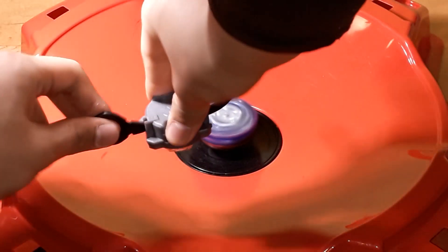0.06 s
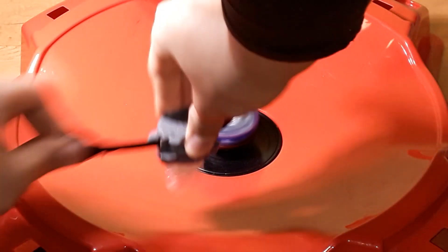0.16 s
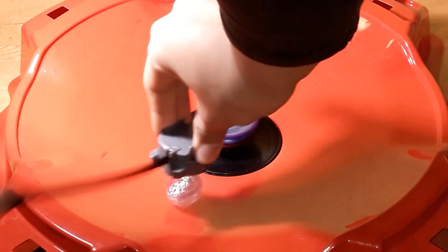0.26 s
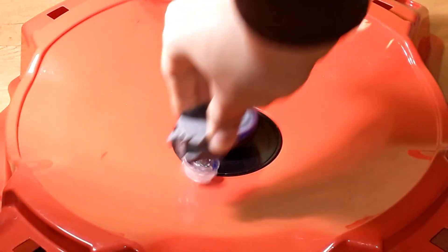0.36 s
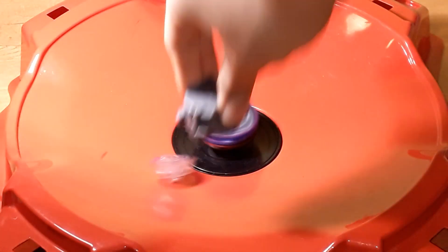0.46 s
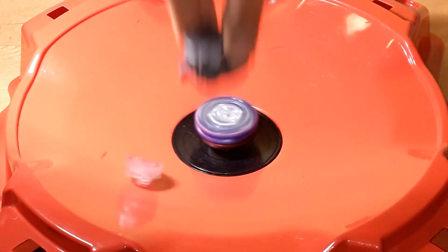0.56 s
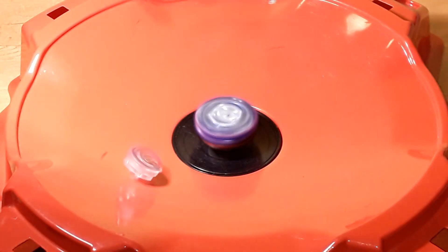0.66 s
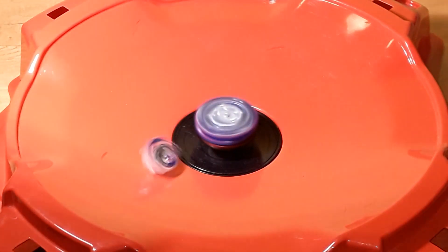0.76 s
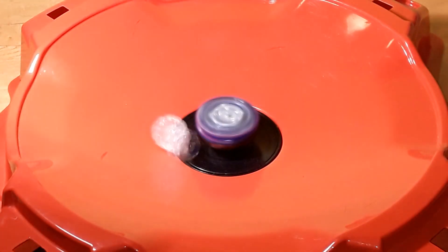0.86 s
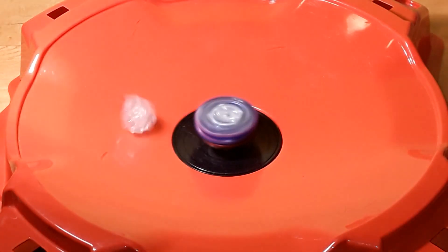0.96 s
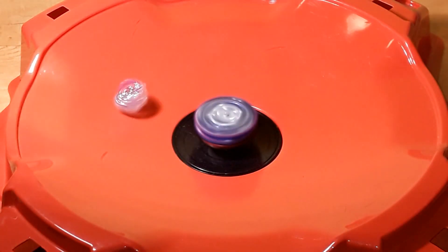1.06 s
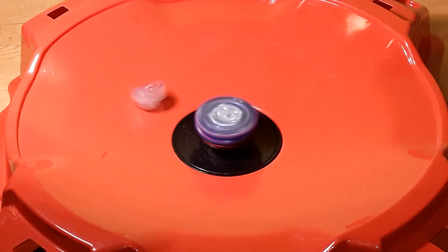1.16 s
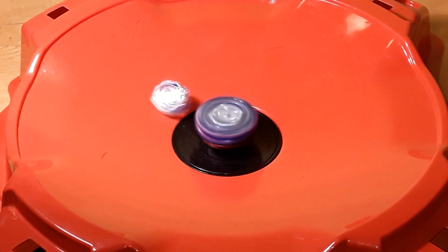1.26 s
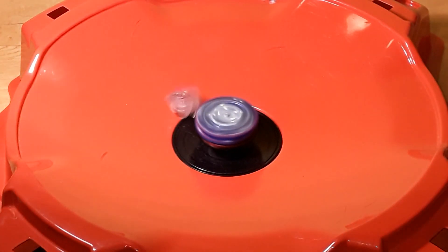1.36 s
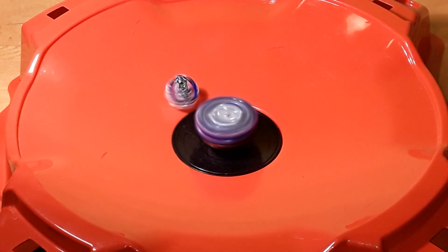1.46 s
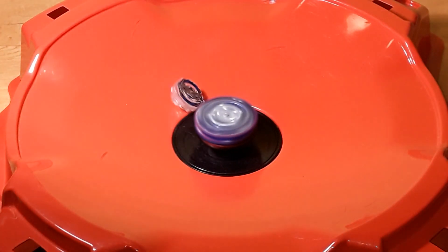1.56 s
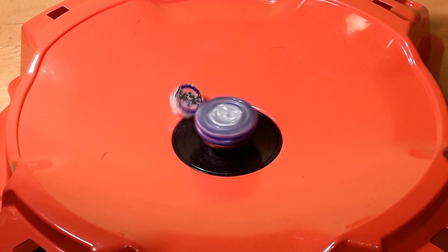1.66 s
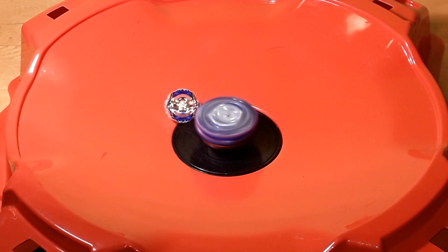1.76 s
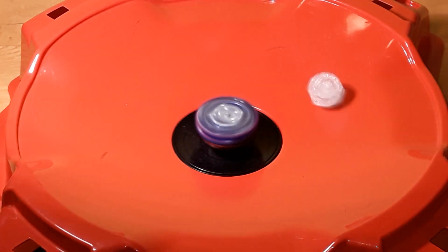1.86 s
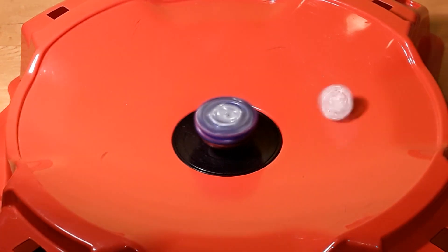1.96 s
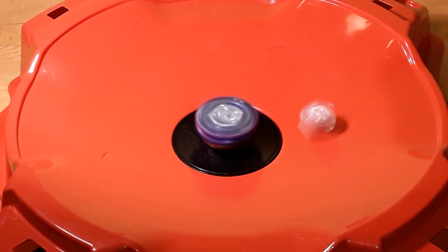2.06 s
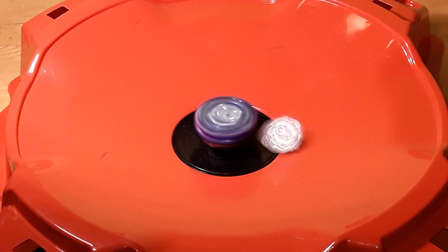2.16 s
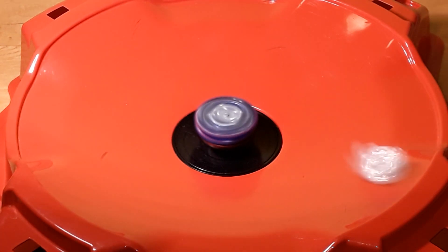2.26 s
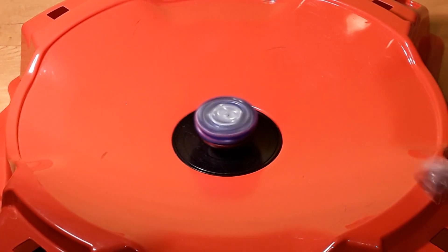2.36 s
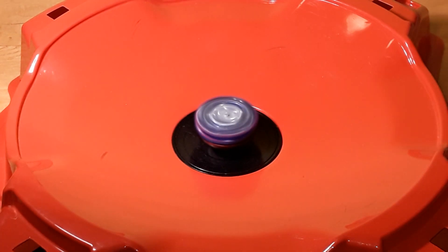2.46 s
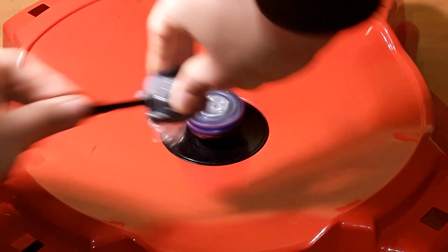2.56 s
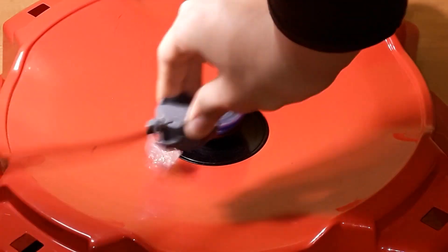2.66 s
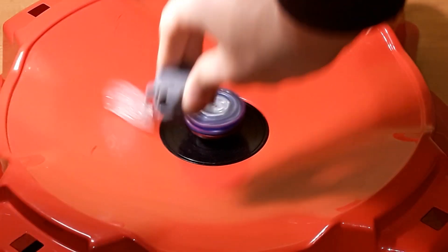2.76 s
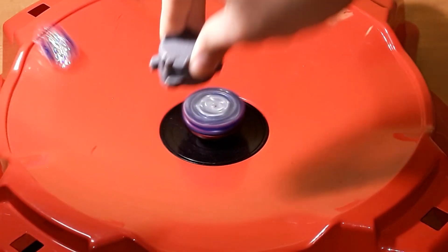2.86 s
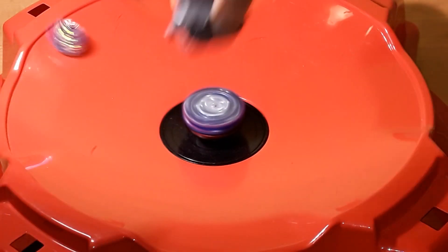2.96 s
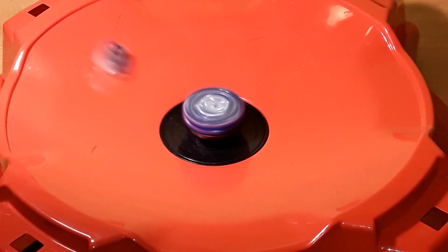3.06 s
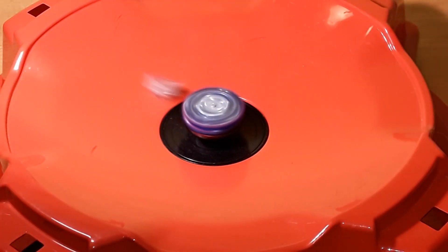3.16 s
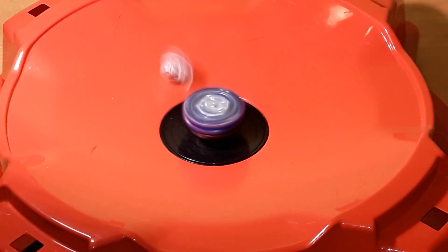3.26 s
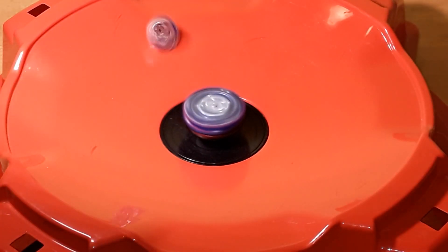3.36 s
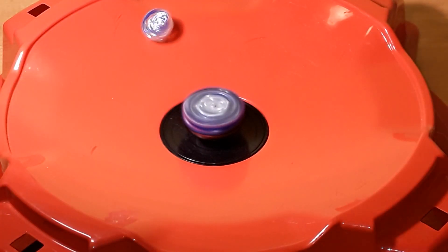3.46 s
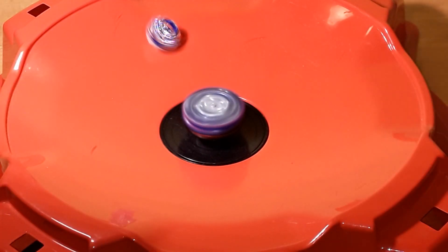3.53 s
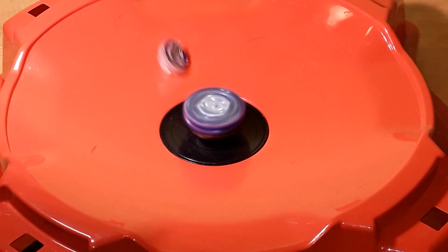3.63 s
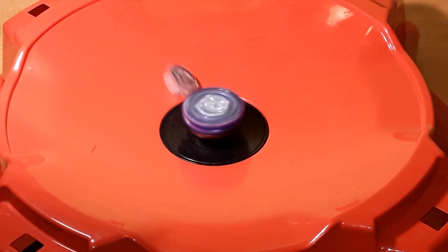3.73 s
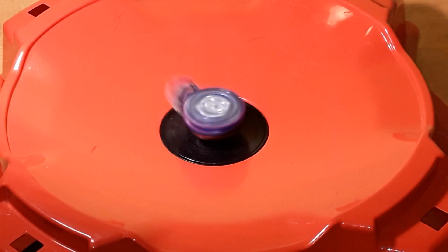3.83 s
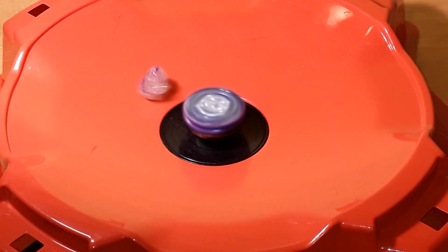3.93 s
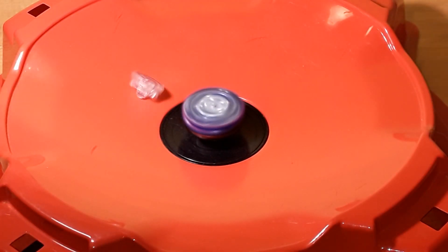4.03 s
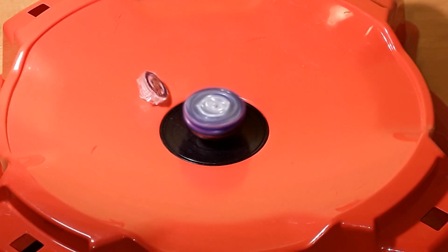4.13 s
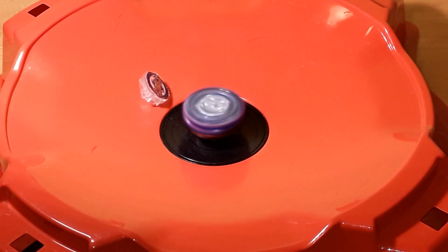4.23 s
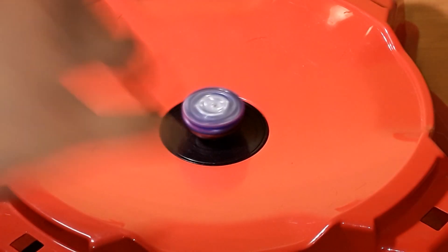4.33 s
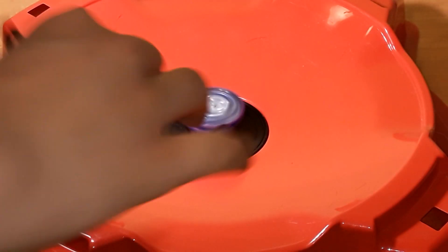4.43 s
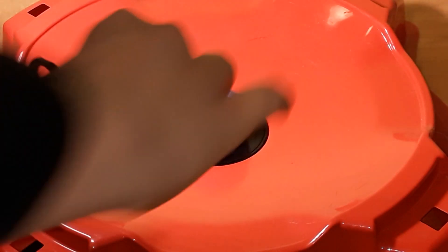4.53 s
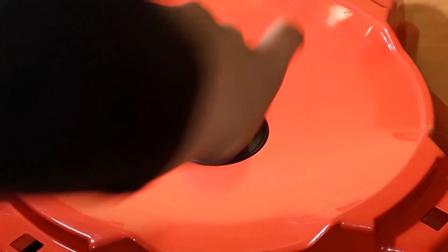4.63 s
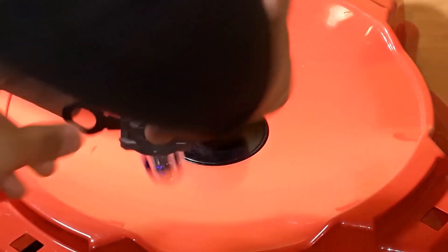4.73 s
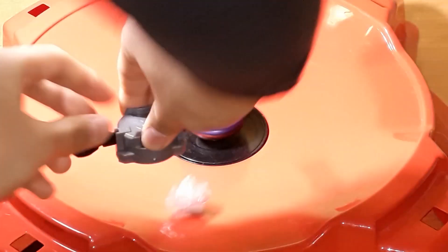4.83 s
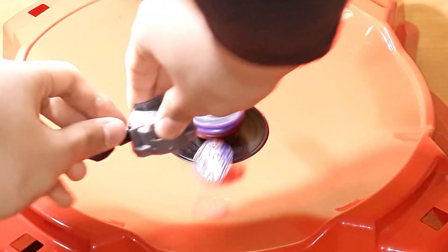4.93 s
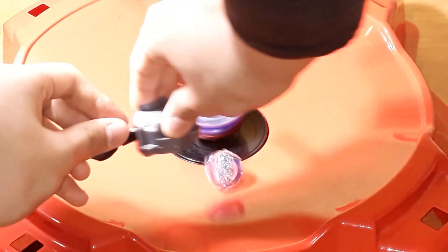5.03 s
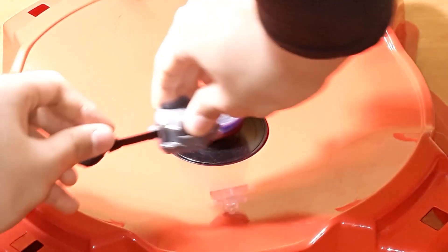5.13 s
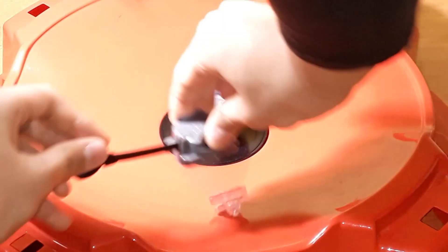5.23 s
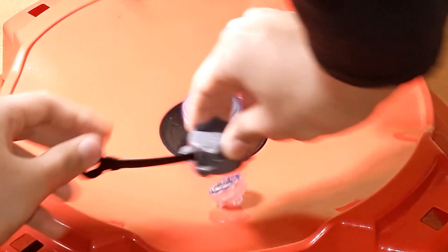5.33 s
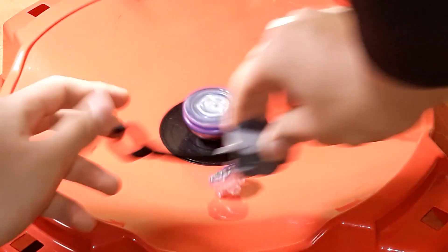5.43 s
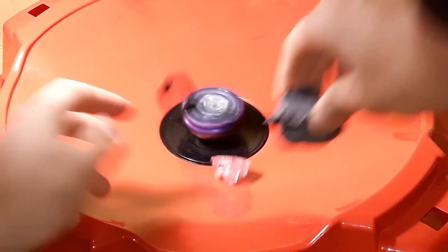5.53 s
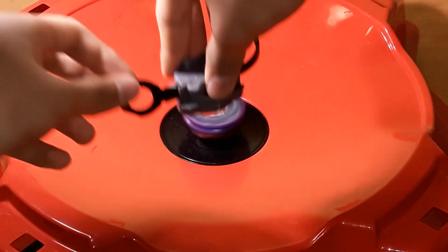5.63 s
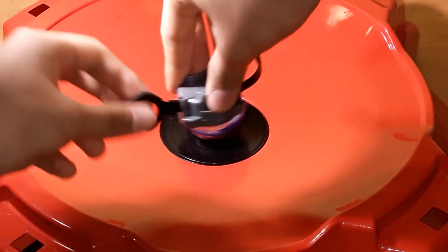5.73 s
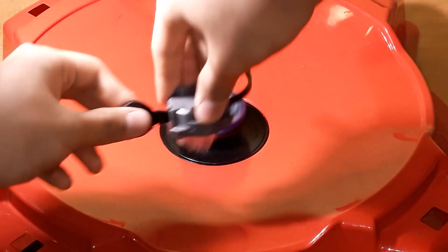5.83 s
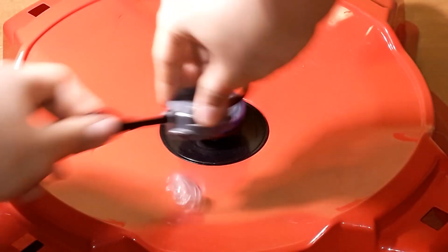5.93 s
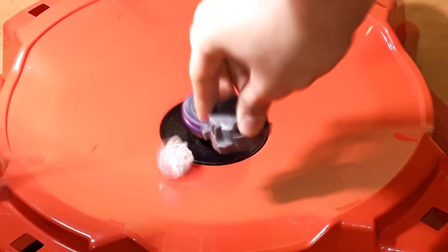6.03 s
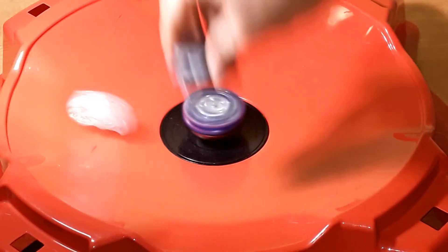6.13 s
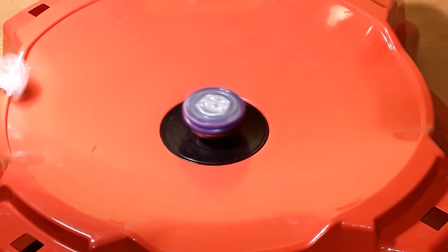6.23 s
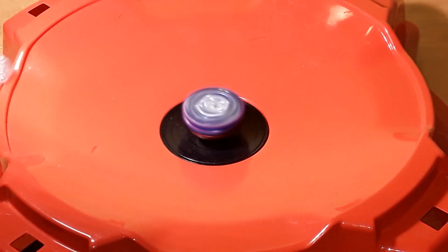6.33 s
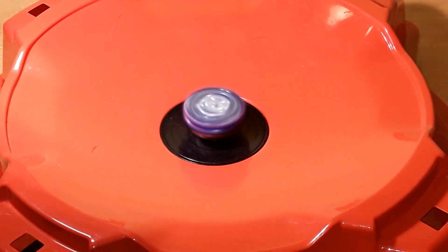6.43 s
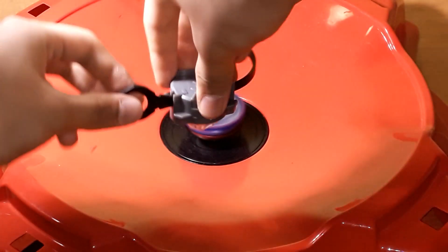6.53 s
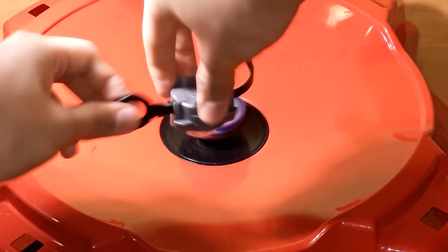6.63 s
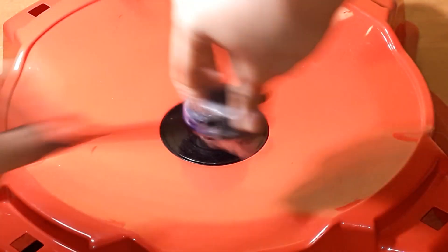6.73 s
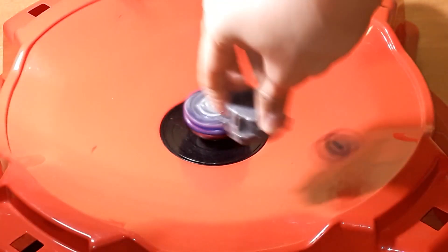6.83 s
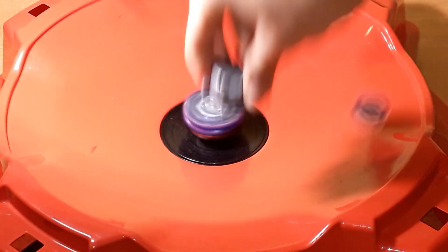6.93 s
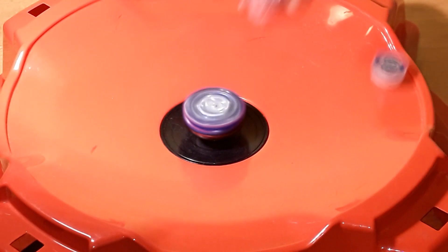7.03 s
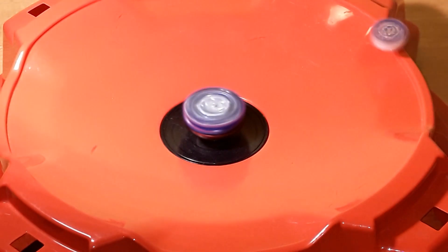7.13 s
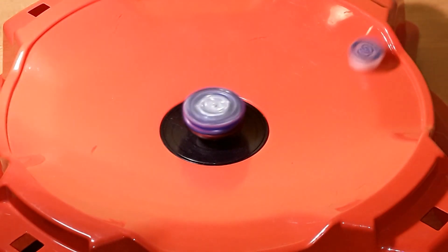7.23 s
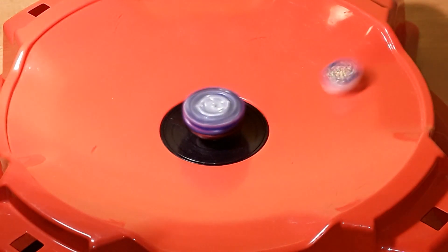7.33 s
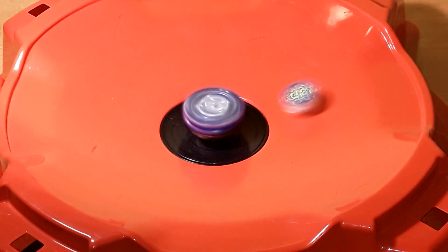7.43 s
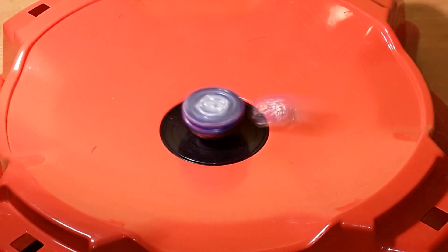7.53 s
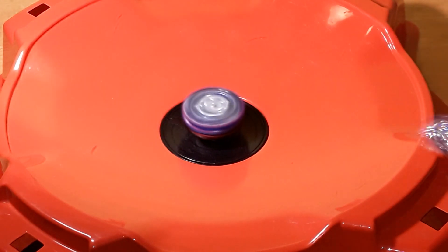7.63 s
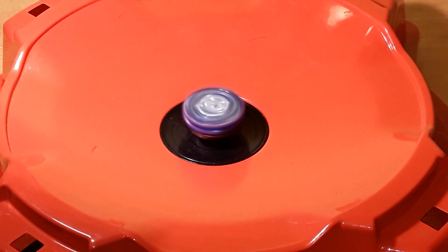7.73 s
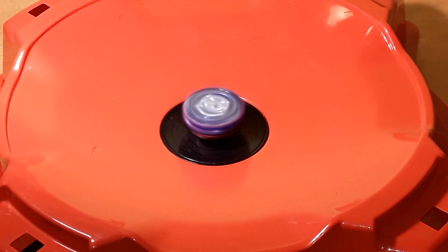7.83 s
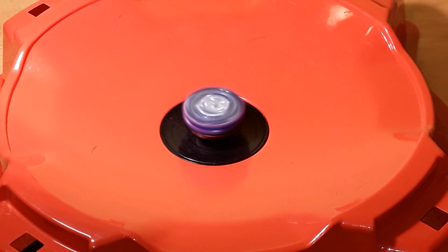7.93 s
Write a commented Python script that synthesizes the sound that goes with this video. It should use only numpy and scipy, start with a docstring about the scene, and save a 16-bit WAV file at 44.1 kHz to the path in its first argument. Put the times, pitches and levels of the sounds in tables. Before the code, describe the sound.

Close to one microphone in a small room, a heavy top whirrs in a thin plastic bowl. Ratcheting ripcords zip, light plastic tops land with hollow drumming thuds, wander with a soft rumble, and hit the spinning rim with bright clacks. Quieter whirring stretches follow each launch, then more zips and knocks come in quick succession.

```python
"""In a plastic arena in a small room, toy tops are launched one after another while a heavy top spins on.
The tips whirr as noise scraped over the plastic; small random hops keep the thin bowl rumbling.
Light tops drop and drum on the bowl's modes, skid once, and clack rim to rim in bright noise bursts.
Each ripcord rattles as a run of pawl clicks through its launcher; a limiter holds the peaks."""
import sys
import numpy as np
from scipy import signal
from scipy.fft import rfft, irfft, next_fast_len
from scipy.io import wavfile
from scipy.ndimage import uniform_filter1d, minimum_filter1d, map_coordinates

SR = 44100
rng = np.random.default_rng(int(sys.argv[2]) if len(sys.argv) > 2 else 0)


def store_pcm(level_fs):
    """Save levels as 16-bit WAV."""
    pcm = np.round(np.clip(level_fs, -1, 1) * 32767).astype(np.int16)
    wavfile.write(sys.argv[1], SR, np.atleast_2d(pcm).T)


N = 352359
TIME = np.arange(N) / SR  # the whole scene, s
HIT = np.arange(SR // 3) / SR  # the span of one hit, s


def amp(db):
    """Decibels to gain."""
    return 10 ** (np.asarray(db) / 20)


def unit(x):
    """Scale to rms 1."""
    return x / np.sqrt(np.mean(x ** 2) + 1e-20)


def punch(x, size=176):
    """Scale a hit so that its loudest few milliseconds have rms 1."""
    return x / np.sqrt(uniform_filter1d(x ** 2, size).max() + 1e-20)


def along(points, hz):
    """Read (Hz, value) points on a log axis."""
    point_hz, values = np.transpose(points)
    return np.interp(np.log(hz + 1), np.log(point_hz + 1), values)


def curves(rows):
    """One value per sample for each column after the time."""
    s, *columns = np.transpose(rows)
    return [np.interp(TIME, s, column) for column in columns]


def wobble(rate):
    """A smooth random curve with rate knots a second."""
    knots = rng.standard_normal(int(N * rate / SR) + 4)
    return map_coordinates(knots, [TIME * rate])


def filtered(x, response):
    """Multiply the spectrum of x by a function of frequency."""
    size = next_fast_len(len(x) + 8192, real=True)
    hz = np.fft.rfftfreq(size, 1 / SR)
    return irfft(rfft(x, size) * response(hz), size)[:len(x)]


def resonate(x, modes):
    """Pass x through parallel (Hz, width Hz, dB) resonances of alternating sign."""
    def response(hz):
        total = 0
        for k, (centre, width, db) in enumerate(modes):
            damping = 1j * hz * width
            total = total + (-1) ** k * amp(db) * damping / (centre * centre - hz * hz + damping)
        return total
    return filtered(x, response)


def coloured(x, spectrum):
    """Shape x with a (Hz, dB) spectrum."""
    return filtered(x, lambda hz: amp(along(spectrum, hz)))


def fade(t60, attack=.0001):
    """Quick rise and exponential decay over the length of a hit."""
    return amp(-60 * HIT / t60) * (1 - np.exp(-HIT / attack))


def add(track, s, sound):
    """Mix a sound into the track at time s."""
    part = track[max(round(s * SR), 0):][:len(sound)]
    part += sound[:len(part)]


# How long the small room rings: pitch_hz [Hz], t60_s [s]
ROOM_DECAY = [(200, 0.24), (1500, 0.26), (6000, 0.28), (15000, 0.18)]


def in_room(x, wet_db, delay=.009):
    """Add the room's answer: decaying noise that starts after the trip to the nearest surfaces."""
    hz, t, grains = signal.stft(rng.standard_normal(len(HIT)), SR, nperseg=256)
    decay = amp(-60 * t / along(ROOM_DECAY, hz)[:, None])
    tail = signal.istft(grains * decay, SR, nperseg=256)[1]
    tail = np.pad(tail / np.linalg.norm(tail), (int(delay * SR), 0))
    return x + amp(wet_db) * signal.fftconvolve(x, tail)[:len(x)]


# How loud the whirr is heard, as hands and launcher come and go over the arena, before the layer trims:
# time_s [s], whirr_db [dB]
SPIN_LEVEL = [(.03, -26.5), (.78, -33), (2.15, -35), (3.15, -34), (4.33, -37), (4.39, -44), (4.52, -41.5),
              (4.75, -30), (5.32, -33.5), (5.55, -34), (5.68, -27.5), (5.88, -27), (6.49, -36.5),
              (6.58, -27), (7.03, -35), (7.42, -38)]
# Tone of the low whirr: pitch_hz [Hz], level_db [dB]
WHIRR_TONE = [(40, -14), (85, -6), (130, -8), (230, -1.5), (305, 6), (420, -13), (590, -1.5), (730, 0),
              (950, -2), (1180, 7), (2000, 4), (2860, 3.5), (4700, 1), (6000, -13.5), (9000, -34)]
# Tone of the fizz on top: pitch_hz [Hz], level_db [dB]
HISS_TONE = [(3500, -1.5), (5500, 5), (7300, -1), (8700, 4), (9800, -6.5), (15000, -4), (16000, -5)]
# Narrow resonances of the bowl wall, also heard in the landings: pitch_hz [Hz], level_db [dB]
WALL_MODES = [(605, -3), (1110, 7), (1200, -3.5), (1500, 0), (1900, -0.5), (2170, -5), (2380, -25),
              (2690, 3.5), (2830, 4), (3480, 4.5)]


def spinning(whirr_db=-1.5, wall_db=-8, hiss_db=-8.0, turn_depth=0.11, grit_db=2.0, wall_width_hz=24):
    """The tips scrape the plastic, pressing harder once a turn."""
    turns_per_s = np.interp(TIME, [0, 8], [58, 50]) + 3 * wobble(5.5)
    turns = np.cumsum(turns_per_s) / SR
    grit = amp(grit_db * wobble(260) + 0.68 * wobble(14))
    pressure = (1 + turn_depth * np.sin(2 * np.pi * turns)) * grit

    def scrape():
        """Fresh noise under the same pressure."""
        return pressure * rng.standard_normal(N)

    whirr = unit(coloured(scrape(), WHIRR_TONE))
    wall = unit(resonate(scrape(), [(hz, wall_width_hz, db) for hz, db in WALL_MODES]))
    hiss = unit(coloured(scrape(), HISS_TONE))
    tips = amp(whirr_db) * whirr + amp(wall_db) * wall + amp(hiss_db) * hiss
    return in_room(amp(curves(SPIN_LEVEL)[0]) * tips, wet_db=-9.5)


# The light top wandering over the bowl, before the layer trim: time_s [s], rumble_db [dB]
ROLL_LEVEL = [(.04, -38.5), (.8, -33.5), (1.12, -33.5), (1.24, -49), (1.32, -27.5), (1.44, -44.5),
              (1.88, -45), (2.13, -29.5), (2.5, -43), (3.0, -34.5), (3.6, -49), (3.78, -42), (4.4, -48.5),
              (5.4, -41), (5.53, -32), (6.1, -36), (6.45, -47), (6.6, -33.5), (7.35, -35), (7.5, -51)]
# Modes of the thin bowl, for rolling and landings: pitch_hz [Hz], level_db [dB], t60_s [s]
BOWL_MODES = [(100.7, -24.5, .22), (178, -14.5, 0.23), (253, -24, 0.098), (292.5, -5, 0.12),
              (311.2, -0.5, 0.12), (331.7, 0.5, 0.11), (380.4, 0.5, 0.13), (421.2, -3, 0.17),
              (469.5, -8, 0.14), (508.8, -4.5, 0.2), (566.8, -2.5, 0.13), (620, -2, 0.11),
              (665, -9.5, 0.23)]
# Drops onto the bowl, before the landing trims; they also stir the rumble: start_s [s], drum_db [dB],
# slap_db [dB], spot_hz (favoured pitch) [Hz], flight_s (to the bounce) [s], bounce_loss_db [dB]
DROP_EVENTS = [(.186, -8.5, -12.5, 323, 0.025, 7), (.314, -23, -19.5, 376, .086, 1),
               (.433, -20.5, -27, 380, 0.11, 6), (.642, -28, -44, 378, 0.085, 0),
               (.845, -11, -19.5, 340, 0.014, 8), (.915, -20, -30, 315, .043, 7),
               (1.002, -21.5, -31, 304, 0.064, 10), (1.94, -31, -44, 340, .02, 3),
               (2.203, -21, -20.5, 308, 0.019, 10), (2.288, -23.5, -21, 402, 0.043, 6),
               (2.463, -23.5, -26, 312, .02, 19), (2.656, -11.5, -20, 340, 0.022, 5),
               (2.73, -9.5, -20, 320, 0.05, 8.5), (2.85, -20.5, -25, 390, .02, 9),
               (2.907, -23, -21, 393, 0.046, 4), (3.037, -21, -32, 390, .012, 10),
               (3.317, -23.5, -32, 309, .012, 0), (3.393, -21, -36, 304, 0.018, 8),
               (3.651, -31.5, -28.5, 299, .031, 4), (3.846, -29, -26, 307, 0.033, 14),
               (3.922, -24, -33, 300, 0.063, 10), (4.27, -40, -50, 329, .02, 6),
               (4.78, -13, -14.5, 360, 0.021, 8), (4.791, -9, -12, 310, 0.022, 14),
               (4.934, -18, -23, 290, .025, 9), (5.02, -13, -21, 374, 0.021, 13),
               (5.116, -11.5, -18, 374, .02, 12), (5.938, -7, -12.5, 374, 0.026, 11),
               (6.061, -15.5, -20, 370, .043, 4), (6.187, -14, -18.5, 370, 0.014, 10),
               (6.232, -18.5, -15.5, 630, 0.019, 15), (6.314, -24, -26, 298, .019, 10),
               (6.81, -6.5, -14.5, 390, .018, 8), (6.887, -13, -23.5, 552, .024, 9),
               (6.962, -20.5, -22.5, 375, 0.021, 13), (7.081, -24.5, -24.5, 600, 0.024, 15),
               (7.173, -19.5, -28.5, 560, 0.018, 23), (7.518, -26, -27, 403, 0.08, 2.5),
               (7.81, -34.5, -43, 300, .012, 10)]
SETTLE_DB, SETTLE_T60_S = -19.5, 0.94  # rumble of a top steadying itself, against the drop's drum_db


def rolling(level_db=-3, hops_per_s=120, spread_db=3.5, ring=1.55):
    """The wandering tip makes small irregular hops that drum the bowl softly, more so just after a drop."""
    hop_now = rng.random(N) < hops_per_s / SR
    hops = hop_now * amp(spread_db * rng.standard_normal(N)) * rng.choice([-1, 1], N)
    # a mode's width follows from its ring time, stretched here by ring
    modes = [(hz, np.log(1000) / np.pi / (ring * t60), db) for hz, db, t60 in BOWL_MODES]
    rumble = resonate(hops, modes)
    # divide out most of the rumble's own swell so that the level curve leads
    swell = np.sqrt(np.abs(uniform_filter1d(rumble ** 2, size=SR // 20)) + 0.061 * np.var(rumble))
    power = amp(curves(ROLL_LEVEL)[0] + level_db) ** 2
    for start, drum_db, *_ in DROP_EVENTS:
        settle_db = drum_db + SETTLE_DB - 60 * TIME[:SR] / SETTLE_T60_S
        add(power, start, amp(settle_db) ** 2)
    return np.sqrt(power) * rumble / swell


SKID_S, SKID_LENGTH_S, SKID_RISE_S = 2.252, .04, 0.024


def skid(level_db=-17, grit_db=2.5):
    """The toppling top drags its spinning rim over the bowl: gritty noise rasps for an instant."""
    rasp = rng.standard_normal(N) * amp(grit_db * wobble(450))
    tone = [(600, -25), (2000, -5), (5000, 1), (8500, 2), (10500, -5), (15000, -3.5)]  # (Hz, dB)
    rasp = unit(coloured(rasp, tone))
    pressure = np.clip((TIME - SKID_S) / SKID_RISE_S, 0, 1) * (TIME < SKID_S + SKID_LENGTH_S)
    return in_room(rasp * pressure * amp(level_db), wet_db=-16)


SLAP_LOSS_DB = 1.5  # a bounce is softer, so its slap loses this much more than its drum


def contacts():
    """Each drop lands and bounces once: (start_s, drum_db, slap_db, spot_hz) for every contact."""
    rows = []
    for start, drum_db, slap_db, spot_hz, flight, loss in DROP_EVENTS:
        rows.append((start, drum_db, slap_db, spot_hz))
        rows.append((start + flight, drum_db - loss, slap_db - loss - SLAP_LOSS_DB, spot_hz))
    return rows


# The bowl's dense upper modes, as the tone of the slap: pitch_hz [Hz], level_db [dB]
SLAP_TONE = [(60, -51), (250, -19), (600, 4.5), (850, 11.5), (1150, 12), (1500, 9.5), (2200, -5.5),
             (4000, -2), (10000, -22)]


def landings(drum_trim_db=-1, slap_trim_db=0, slap_t60=0.072, wall_db=-7, wall_width_hz=40,
             spot_db=9.0, spot_octaves=0.19, scatter_db=3.0, detune=0.013):
    """A tip strikes the bowl: a slap, then the modes that move most at that spot drum on."""
    wall_modes = [(hz, wall_width_hz, db) for hz, db in WALL_MODES]
    out = np.zeros(N)
    for start, drum_db, slap_db, spot_hz in contacts():
        drum = np.zeros(len(HIT))
        for hz, db, t60 in BOWL_MODES:
            size, pitch, phase = rng.standard_normal(3)
            # each spot of the bowl favours the modes near one frequency
            favour_db = spot_db * np.exp(-(np.log2(hz / spot_hz) / spot_octaves) ** 2)
            tone = np.sin(2 * np.pi * hz * (1 + detune * pitch) * HIT + 1.57 * phase)
            drum += amp(db + favour_db + scatter_db * size) * fade(t60, attack=0.0013) * tone
        slap_noise = coloured(rng.standard_normal(len(HIT)), SLAP_TONE)
        slap = punch(slap_noise * fade(slap_t60, attack=0.00023))
        wall = punch(resonate(slap, wall_modes))
        blow = amp(drum_db + drum_trim_db) * punch(drum)
        blow += amp(slap_db + slap_trim_db) * (slap + amp(wall_db) * wall)
        add(out, start, in_room(blow, wet_db=-9, delay=.016))
    return out


# Rim clashes, before the band trims: start_s [s], peak_db [dB], middle_db [dB], treble_db [dB]
CLASH_EVENTS = [(.393, -6, -15.5, -9), (.843, -11, -11, -14.5), (.915, -17, -22.5, -32),
                (1.335, -13, -25, -22), (2.067, -33, -43, -29), (2.203, -8.5, -17.5, -14.5),
                (2.287, -13.5, -22, -17.5), (2.46, -19, -30, -28), (2.759, -5, -18, -7.5),
                (3.247, -12.5, -22, -12), (3.331, -26, -27, -37), (3.846, -8.5, -15, -15.5),
                (4.957, -3, -20, -9), (6.104, -8, -15, -15.5), (6.333, -19, -23, -32),
                (6.45, -16.5, -29, -35), (6.536, -27, -27, -42), (6.674, -16, -29, -16),
                (7.083, -14, -16.5, -18), (7.516, -9, -16, -9.5), (7.601, -20.5, -21, -28),
                (7.787, -24, -32.5, -28), (7.821, -18.5, -33, -33), (7.963, -29, -26.5, -46)]
# Resonances of a top's body: pitch_hz [Hz], width_hz [Hz], level_db [dB]
TOP_MODES = [(1740, 2000, -1), (3480, 700, 6), (4150, 790, 4.5), (5680, 660, 6), (7044, 2000, -2),
             (8570, 800, 4.5), (11600, 2200, -10.5), (14900, 2100, -2)]
# The top's own click over a contact's drum_db, before the band trims: peak_db, middle_db, treble_db [dB]
TIP_CLICK_LEVELS = (-7.5, -13, -14)
REGRAZE_S, REGRAZE_DB = .01, -12  # half a turn after a clash the rim grazes again
CLACK_BANDS_HZ = [(3400, 7000), (1300, 3400), (6800, 14000)]  # peak, middle, treble


def clacks(peak_trim_db=-4.0, middle_trim_db=-1, treble_trim_db=-1, ring_t60=0.024, crack=6,
           bare_share=0.41, detune=0.032, scatter_db=2.0):
    """Rim meets rim, or tip meets bowl: a broad crack and a short ring coloured by the struck point."""
    bands = [signal.butter(2, edges, 'bandpass', fs=SR, output='sos') for edges in CLACK_BANDS_HZ]
    trims = np.array([peak_trim_db, middle_trim_db, treble_trim_db])
    tip_clicks = [(s, *(db + np.array(TIP_CLICK_LEVELS))) for s, db, *_ in contacts()]
    grazes = [(s + REGRAZE_S, *(np.array(levels) + REGRAZE_DB)) for s, *levels in CLASH_EVENTS]
    out = np.zeros(N)
    for start, *levels in list(CLASH_EVENTS) + grazes + tip_clicks:
        # each point of the rim favours the body's modes a little differently
        modes = [(hz * (1 + detune * rng.normal()), width, db + scatter_db * rng.normal())
                 for hz, width, db in TOP_MODES]
        clack = np.zeros(len(HIT))
        for band, level_db in zip(bands, np.array(levels) + trims):
            contact = rng.standard_normal(len(HIT)) * fade(ring_t60)
            contact[0] = crack
            bare = rng.standard_normal(len(HIT)) * fade(ring_t60)
            rim = resonate(contact, modes) + bare_share * bare
            clack += amp(level_db) * punch(signal.sosfilt(band, rim))
        add(out, start, in_room(clack, wet_db=-5))
    return out


# Ripcord pulls: start_s [s], run_up_s [s], length_s [s], first_rate [teeth/s], final_rate [teeth/s],
# level_db (at the final rate, before chatter and the layer trim) [dB]
PULL_EVENTS = [(.068, .16, 0.19, 144, 386, -13), (2.596, .03, 0.09, 384, 400, -13.5),
               (5.03, .2, 0.23, 129, 55, -33.5), (5.905, .095, .15, 120, 560, -11.5),
               (6.655, 0.078, .15, 91, 400, -13)]
# Resonances of launcher shell and pawl: pitch_hz [Hz], width_hz [Hz], level_db [dB]
PAWL_MODES = [(2660, 99, 1), (4750, 2000, -5.5), (5970, 800, 2.5), (6580, 520, -0.5), (8555, 424, 7),
              (11130, 1270, -3.5), (15200, 3700, -1)]
PULL_DB_PER_DOUBLING = 6.5  # a faster cord rattles louder
PULL_RELEASE_S, PULL_RELEASE_DB = .035, 17  # the ratchet runs out as the cord leaves


def ripcords(trim_db=-1, scatter_db=2.0, chatter_db=3, jitter_s=.0002, snap_t60=0.014):
    """The pawl snaps over each tooth and chatters in bursts; speed adds level and blurs clicks to a zip."""
    chatter = chatter_db * wobble(170)
    snap_shape = fade(snap_t60, attack=0.00022)[:SR // 80]
    t = np.arange(2 * len(HIT)) / SR
    out = np.zeros(N)
    for start, run_up, length, first_rate, final_rate, level_db in PULL_EVENTS:
        rate = np.interp(t, [0, run_up], [first_rate, final_rate])
        level = level_db + PULL_DB_PER_DOUBLING * np.log2(rate / final_rate)
        level -= PULL_RELEASE_DB * np.maximum(t - length, 0) / PULL_RELEASE_S
        level = level + chatter[round(start * SR):][:len(t)]
        # a tooth passes whenever the running count reaches a new whole number
        teeth = np.flatnonzero(np.diff(np.floor(np.cumsum(rate) / SR), prepend=-1))
        clicks = np.zeros(len(t))
        for i in teeth[t[teeth] <= length + PULL_RELEASE_S]:
            snap = rng.standard_normal(len(snap_shape)) * snap_shape
            # the root keeps the rattle's average power independent of the tooth rate
            strength = amp(level[i] + scatter_db * rng.normal()) * np.sqrt(SR / rate[i])
            add(clicks, t[i] + jitter_s * rng.normal(), strength * snap / np.linalg.norm(snap))
        zip_sound = unit(resonate(clicks, PAWL_MODES)) * np.std(clicks)
        add(out, start, in_room(zip_sound, wet_db=-3.5, delay=0.0036))
    return amp(trim_db) * out


def scene():
    """Everything happens in the bowl, close to one microphone."""
    bowl = spinning() + rolling() + skid() + landings()
    return (bowl + clacks() + ripcords())[None]


CEILING, TOP_HZ = 1.0, 15850  # limiter ceiling (full scale = 1) and upper band limit


def record(dry, low_cut_hz=80, size=60):
    """The microphone sheds deep bass, a fast limiter holds the peaks, then the band limit."""
    x = signal.sosfilt(signal.butter(3, low_cut_hz, 'highpass', fs=SR, output='sos'), dry[0])
    needed = np.minimum(1, CEILING / (np.abs(x) + 1e-9))
    gain = uniform_filter1d(minimum_filter1d(needed, size), size)
    return filtered(x * gain, lambda hz: hz < TOP_HZ)[None]


dry = scene()
out = record(dry)
store_pcm(out)
```